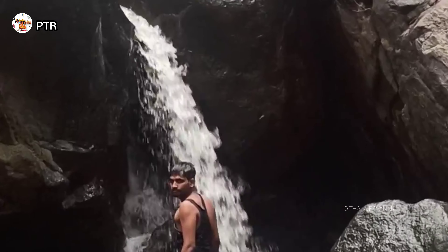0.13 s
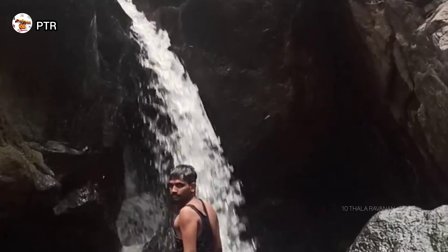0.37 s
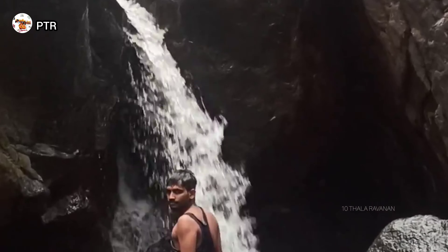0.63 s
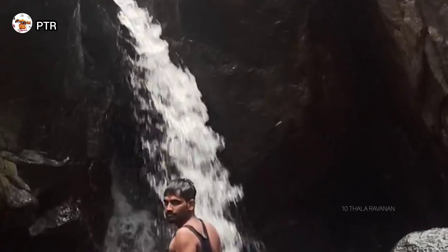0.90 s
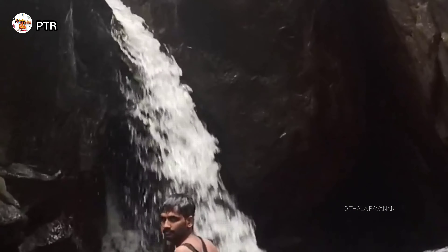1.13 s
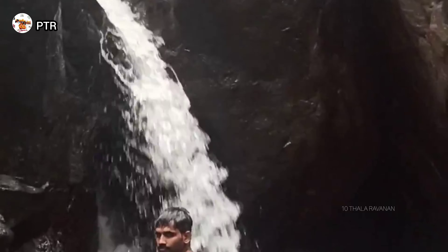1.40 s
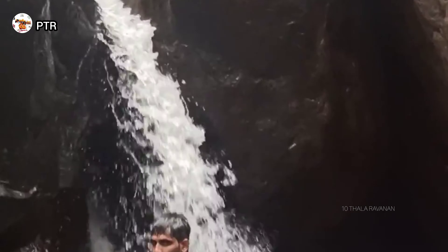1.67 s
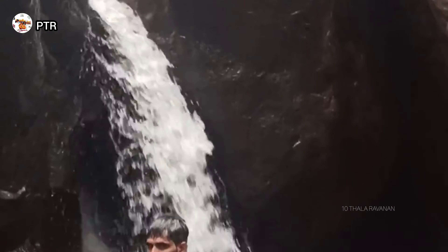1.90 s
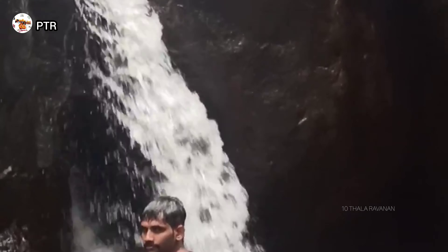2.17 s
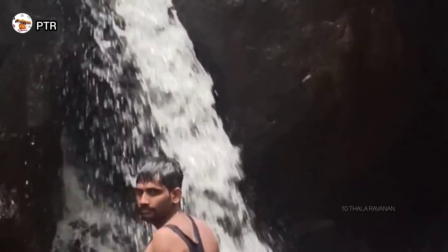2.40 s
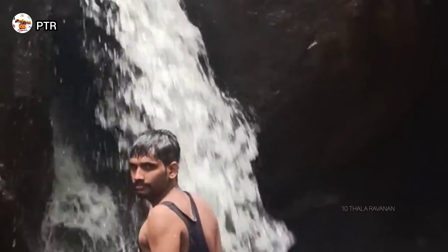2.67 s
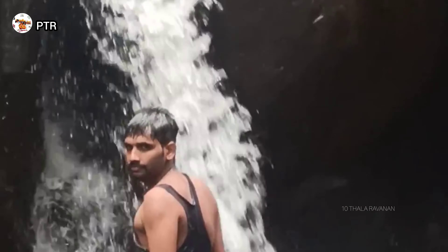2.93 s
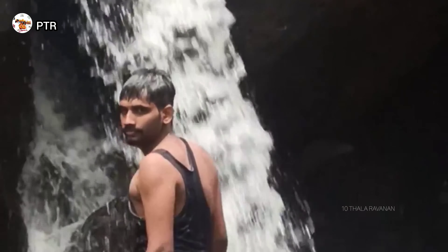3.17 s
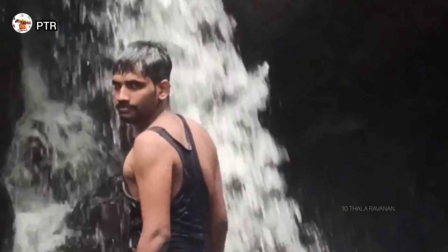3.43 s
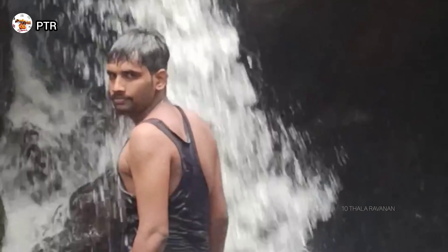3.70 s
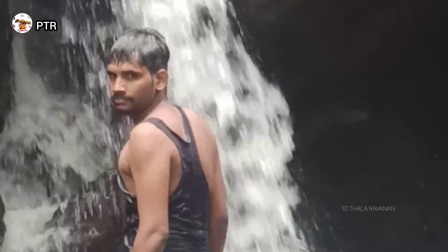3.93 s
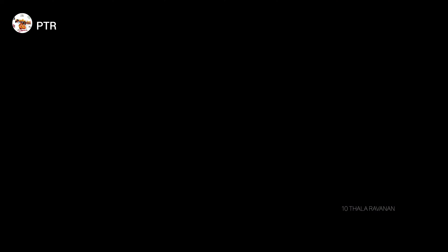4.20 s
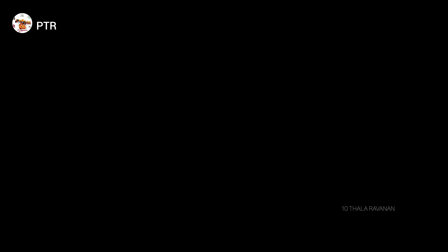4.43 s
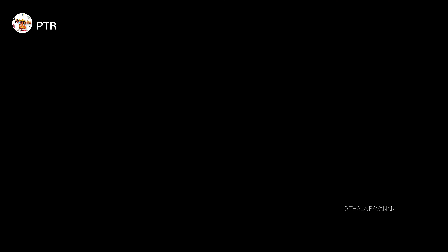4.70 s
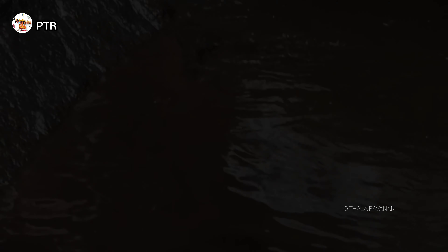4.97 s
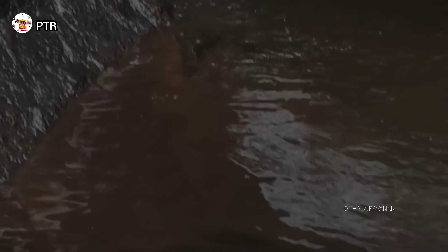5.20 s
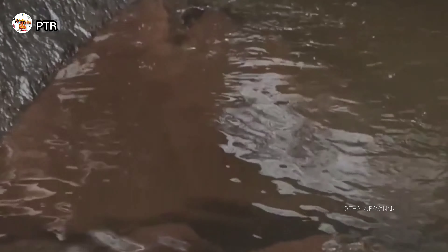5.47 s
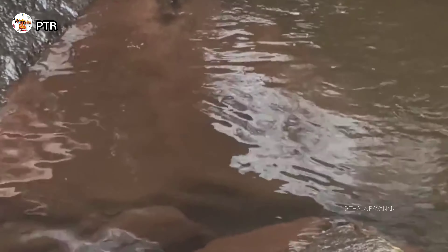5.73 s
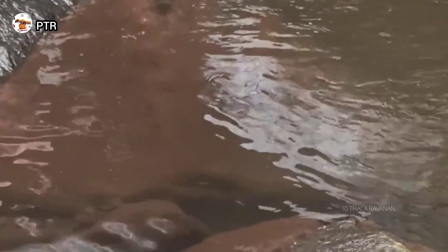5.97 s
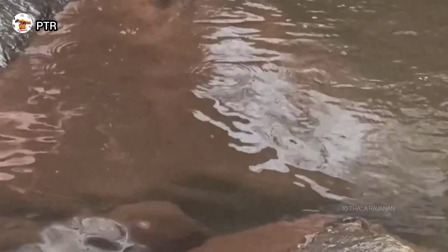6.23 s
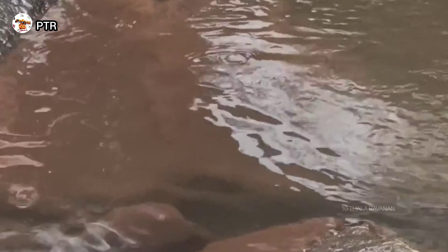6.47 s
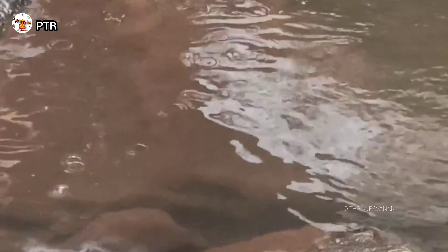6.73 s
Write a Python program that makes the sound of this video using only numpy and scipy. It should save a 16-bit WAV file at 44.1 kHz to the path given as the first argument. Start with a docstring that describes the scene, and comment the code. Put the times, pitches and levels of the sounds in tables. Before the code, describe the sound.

From 0 s a waterfall is already in full flow, heard from a distance outdoors: a dense, continuous rush of water beating on rocks and into a pool. The low roar sits near the centre, while the hissing spray spreads wide left and right. Tiny bubbling textures are buried in the wash, with only very slight fluctuations and no distinct splashes. The treble is crisp but band-limited, with a hollow notch around 10 kHz. At about 4.14 s the sound is cut off almost instantly, leaving roughly 0.14 s of complete silence. From about 4.28 s the water returns in a smooth fade, reaching full level near 4.58 s. This second view is closer: a few decibels louder, fuller and wider, with stronger spray. It then runs on evenly, without any further change or ending fade, to about 7 s.

```python
"""Waterfall from two standpoints

A waterfall beats steadily on rocks and into a pool, heard in stereo from afar and then from nearer.
Churning noise makes the water and rising damped sines make the bubbles; level curves colour both.
An edit cuts the first standpoint off, leaves a short silence and fades the nearer one in.
The bass is almost mono, the spray is wide; the treble comes in steps with a gap near 10 kHz."""
import sys
import numpy as np
from scipy import signal
from scipy.fft import rfft, irfft, next_fast_len
from scipy.io import wavfile
from scipy.ndimage import uniform_filter1d

SR = 44100
rng = np.random.default_rng(int(sys.argv[2]) if len(sys.argv) > 2 else 0)


def linear_from_db(decibels):
    """Turn decibels (scalar or array-like) into linear amplitude factors; 0 gives 1."""
    return 10 ** (np.asarray(decibels, float) / 20)


def digitize_waveform(pressure):
    """Quantize a signal to 16-bit integers and store it at the path in sys.argv[1].

    Rows of a 2-D input are taken as channels; values are limited to [-1, 1].
    """
    field = np.atleast_2d(pressure).T
    bounded = np.clip(field, -1, 1)
    quanta = np.round(bounded * 32767).astype(np.int16)
    wavfile.write(sys.argv[1], SR, quanta)


N = 302526  # length [samples]

# Stereo width at the far standpoint: (frequency [Hz], left-right correlation [-1 to 1])
FAR_CORRELATION = [(35, .5), (90, 0.99), (260, .95), (600, 0.79), (950, .48), (1450, 0.13), (1850, .35),
                   (2600, .02)]
# Stereo width at the near standpoint: (frequency [Hz], left-right correlation [-1 to 1])
NEAR_CORRELATION = [(35, .5), (90, 1), (260, 0.94), (600, 0.48), (780, 0.64), (1100, -0.021), (1400, -0.28),
                    (2100, .1), (3000, -0.015)]
# Roar of the fall from afar: (frequency [Hz], left level [dB per Hz], right level [dB per Hz])
FAR_ROAR_LEVELS = [(30, -90.5, -94), (55, -80, -84), (99, -65, -65.5), (180, -61, -62.5),
                   (396, -60.5, -61.5), (510, -63.5, -65.5), (645, -59, -60.5), (815, -62.5, -64),
                   (980, -64.5, -64.5), (1200, -64, -61.5), (1850, -66, -61.5), (2200, -66.5, -68),
                   (2990, -68, -68), (3850, -64.5, -62.5), (4700, -63.5, -62)]
# Treble from afar, which comes in steps: (frequency [Hz], left level [dB per Hz], right level [dB per Hz])
FAR_SPRAY_LEVELS = [(4780, -70, -68.5), (6080, -67.5, -68), (6160, -61, -60.5), (6830, -58, -58),
                    (6920, -61.5, -62.5), (7600, -56, -57), (7680, -63, -63), (8460, -66, -66.5),
                    (8580, -82, -82.5), (8900, -87, -85.5), (11620, -74.5, -74), (12850, -76.5, -76.5),
                    (12950, -73.5, -70), (15700, -75.5, -71.5)]
# What the step towards the fall adds: (frequency [Hz], left gain [dB], right gain [dB])
NEARER_GAINS = [(40, 2, 2), (100, 4, 4), (400, 2, 4), (660, 2.5, 1.5), (800, 3.5, 6.5), (1500, 3, 5),
                (2200, 2.5, 6.5), (3000, 2.5, 3), (3850, 4, 0), (5200, 4, 6.5), (7000, 3, 0),
                (12000, 3.5, 4.5), (13500, 3.5, 0.5)]

GAP_FROM_HZ, GAP_TO_HZ, TOP_HZ = 8950, 11590, 15740  # silent treble gap and upper limit
CUT_S, CUT_LENGTH_S = 4.1445, 0.001  # the far standpoint stops
FADE_FROM_S, FADE_TO_S = 4.284, 4.575  # the near standpoint rises


def read_curve(points, hz):
    """Reads each column after the frequency at hz, joining points by lines on a log axis."""
    point_hz, *columns = np.transpose(sorted(points))
    position, point_position = np.log(hz + 1), np.log(point_hz + 1)
    return np.array([np.interp(position, point_position, column) for column in columns])


def unit_rms(x):
    """Scales x to an rms of 1."""
    return x / np.sqrt(np.mean(x ** 2) + 1e-20)


def filtered(x, response):
    """Multiplies the spectrum of x by a response of frequency."""
    size = next_fast_len(N + 8192)
    hz = np.fft.rfftfreq(size, 1 / SR)
    return irfft(rfft(x, size) * response(hz), size)[..., :N]


def churn(patchy_db, surge_db):
    """Two noises from countless drops: loud patches come and go, and the whole flow surges a little."""
    spectra = signal.stft(rng.standard_normal((2, N)), nperseg=512)[2]
    bins, frames = spectra.shape[1:]
    # patches spread over neighbouring pitches and moments
    patches = uniform_filter1d(rng.standard_normal((bins, frames)), size=8, axis=0)
    patches = uniform_filter1d(patches, size=16, axis=1)
    surge = uniform_filter1d(rng.standard_normal(frames), size=14)
    surge = uniform_filter1d(surge, size=14)
    gain = linear_from_db(patchy_db * unit_rms(patches) + surge_db * unit_rms(surge))
    noises = signal.istft(spectra * gain, nperseg=512)[1]
    return unit_rms(noises[:, :N])


def bubbles(count, centre_hz, cycles, scatter_db):
    """Air pockets burst in the pool: damped sines whose pitch climbs as they reach the surface."""
    chance = rng.random((count, 4))  # when, pitch, loudness, stream
    t = np.arange(640) / SR
    hz = (centre_hz * 3 ** (2 * chance[:, 1] - 1))[:, None]  # a third to three times the centre
    life = t * hz / cycles  # small, high bubbles live faster
    size = linear_from_db(scatter_db * chance[:, 2])[:, None] * np.sqrt(hz / centre_hz)
    swell_and_decay = life * np.exp(-4 * life)
    rising_tone = np.sin(2 * np.pi * hz * t * (1 + 0.11 * life))
    grains = size * swell_and_decay * rising_tone

    stream_length = N + len(t)
    places = (chance[:, 0] * N).astype(int)[:, None] + np.arange(len(t))
    places += stream_length * (chance[:, 3:] > 0.5)  # about half of them in each of two streams
    streams = np.bincount(places.ravel(), grains.ravel(), 2 * stream_length)
    return unit_rms(streams.reshape(2, -1)[:, :N])


def waterfall(added_gains, correlation, patchy_db, surge_db, bubble_db):
    """Churning water and bubbles, spread over left and right and coloured by the standpoint."""
    water = churn(patchy_db, surge_db)
    pool = bubbles(count=4000, centre_hz=1099, cycles=7, scatter_db=8.0)
    pair = water + linear_from_db(bubble_db) * pool

    def mid_side_share(hz):
        # the cosine of twice this angle is the left-right correlation
        angle = np.arccos(np.clip(read_curve(correlation, hz)[0], -1, 1)) / 2
        return np.array([np.cos(angle), np.sin(angle)])

    def colour(hz):
        level_db = read_curve(FAR_ROAR_LEVELS + FAR_SPRAY_LEVELS, hz) + read_curve(added_gains, hz)
        return linear_from_db(level_db) * np.sqrt(SR / 2)  # from level per Hz to gain on unit noise

    mid, side = filtered(pair, mid_side_share)
    return filtered(np.array([mid + side, mid - side]), colour)


def treble_gap(hz):
    """Passes everything below the gap, and the band between the gap and the upper limit."""
    return (hz < GAP_FROM_HZ) | (hz > GAP_TO_HZ) & (hz < TOP_HZ)


def scene():
    """The far standpoint stops at the cut; the near one rises in a straight fade."""
    t = np.arange(N) / SR
    no_gain = [(1000, 0, 0)]
    far = waterfall(no_gain, FAR_CORRELATION, patchy_db=0.5, surge_db=0.18, bubble_db=-17.5)
    near = waterfall(NEARER_GAINS, NEAR_CORRELATION, patchy_db=0.45, surge_db=-0.07, bubble_db=-17.5)
    far, near = filtered(far, treble_gap), filtered(near, treble_gap)
    cut = np.clip((CUT_S - t) / CUT_LENGTH_S, 0, 1)
    fade = np.clip((t - FADE_FROM_S) / (FADE_TO_S - FADE_FROM_S), 0, 1)
    return far * cut + near * fade


def band_limit(x):
    """A steep low-pass at the top of the band."""
    return signal.sosfilt(signal.butter(12, 16870, fs=SR, output="sos"), x)


def record(dry):
    """Takes the finished mix to its final sound."""
    return band_limit(dry)


dry = scene()
out = record(dry)
digitize_waveform(out)
```